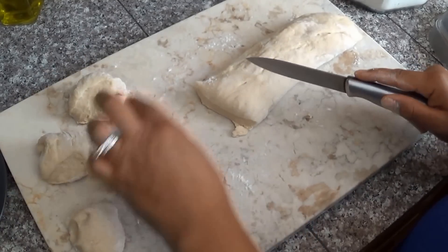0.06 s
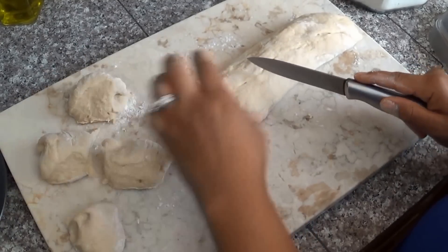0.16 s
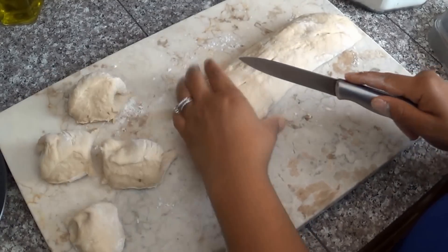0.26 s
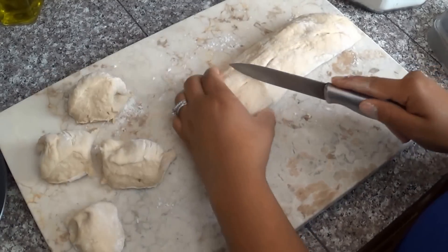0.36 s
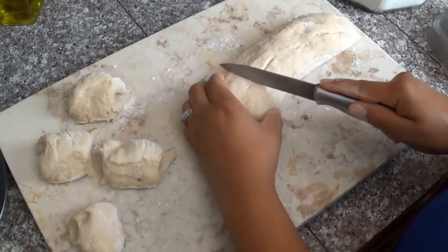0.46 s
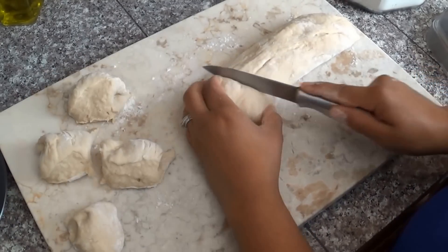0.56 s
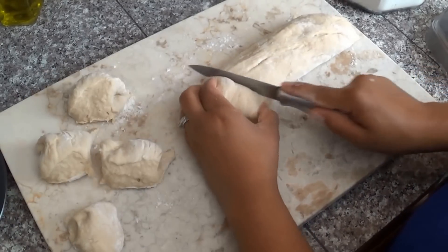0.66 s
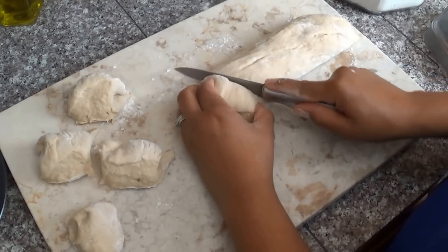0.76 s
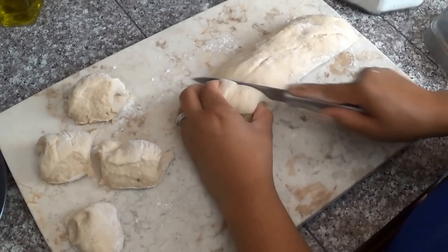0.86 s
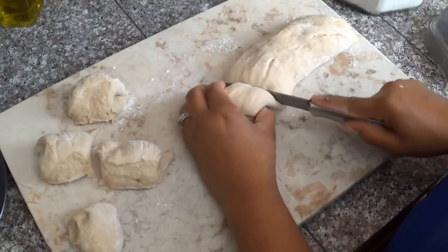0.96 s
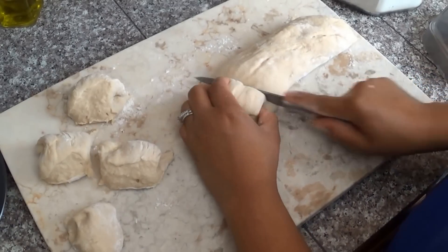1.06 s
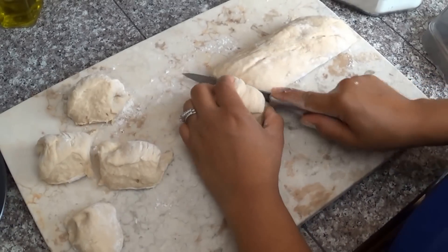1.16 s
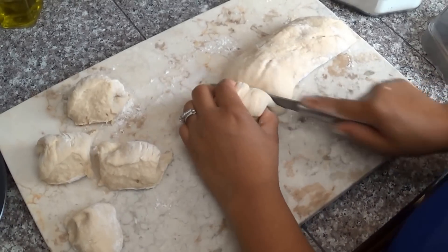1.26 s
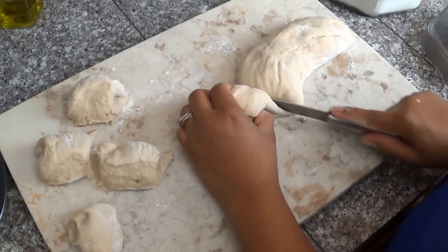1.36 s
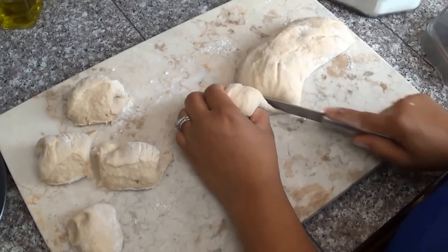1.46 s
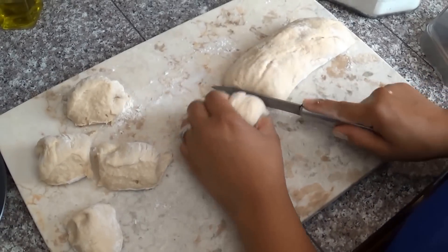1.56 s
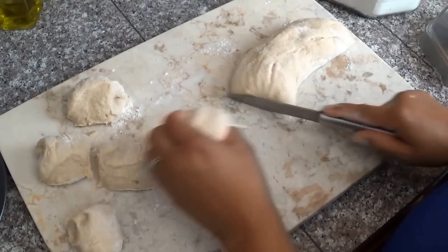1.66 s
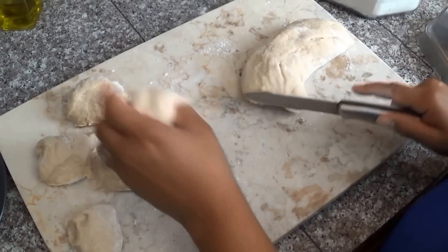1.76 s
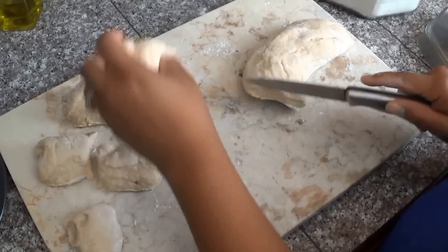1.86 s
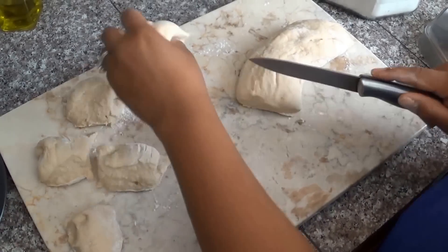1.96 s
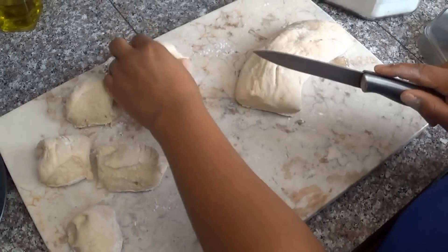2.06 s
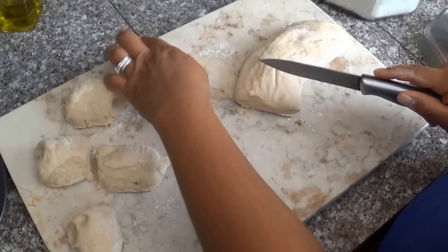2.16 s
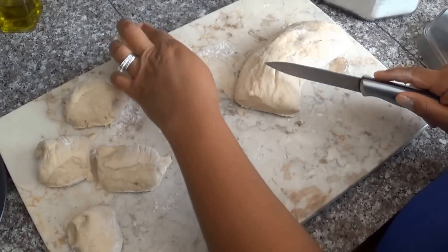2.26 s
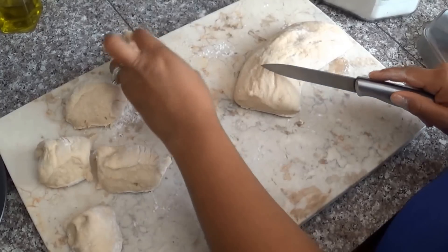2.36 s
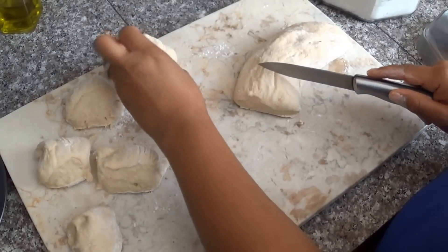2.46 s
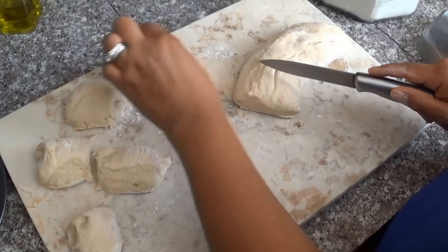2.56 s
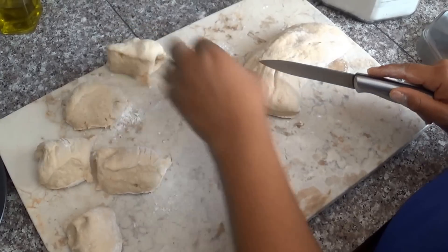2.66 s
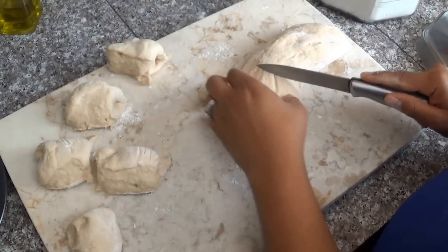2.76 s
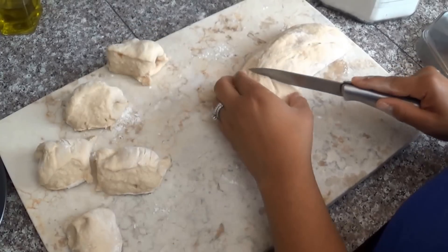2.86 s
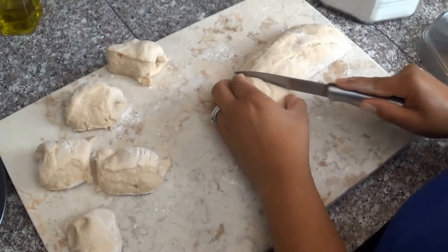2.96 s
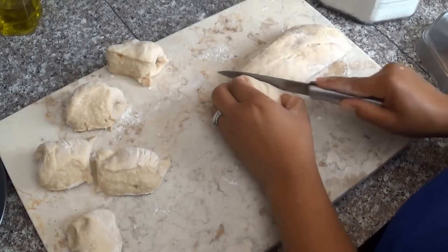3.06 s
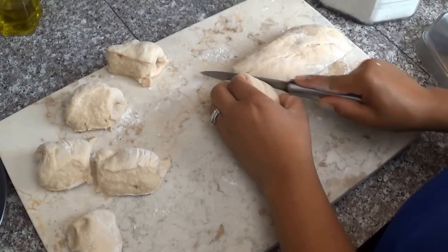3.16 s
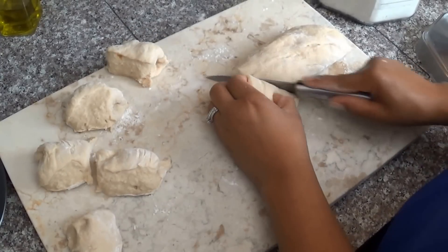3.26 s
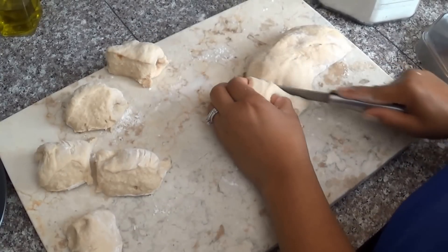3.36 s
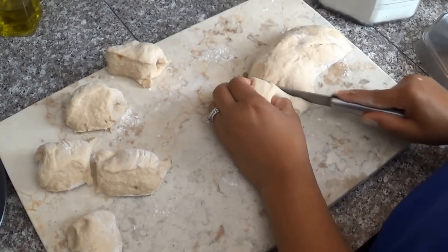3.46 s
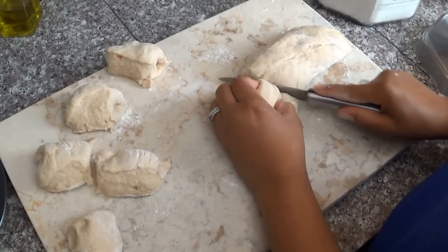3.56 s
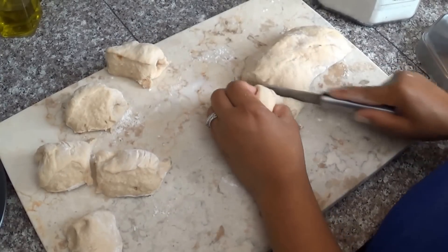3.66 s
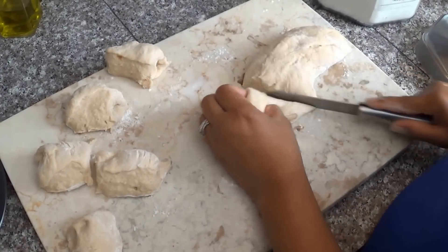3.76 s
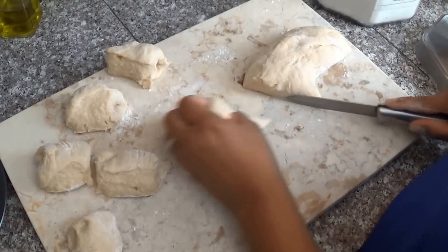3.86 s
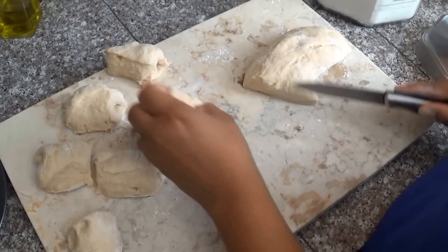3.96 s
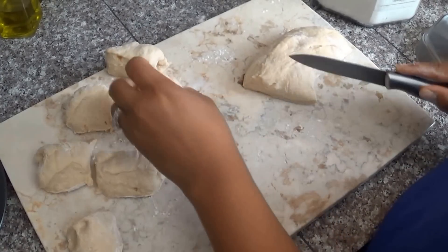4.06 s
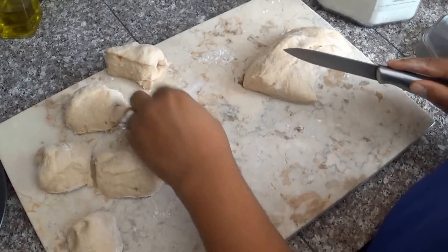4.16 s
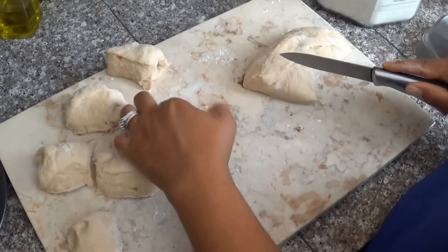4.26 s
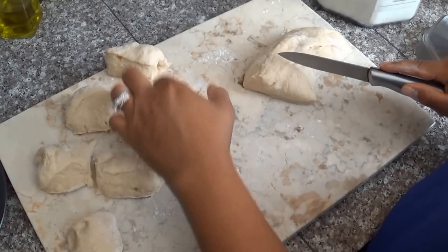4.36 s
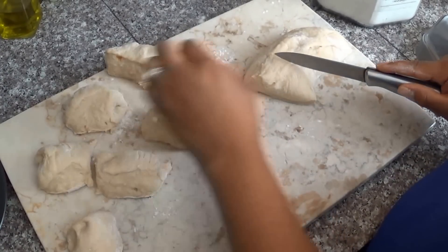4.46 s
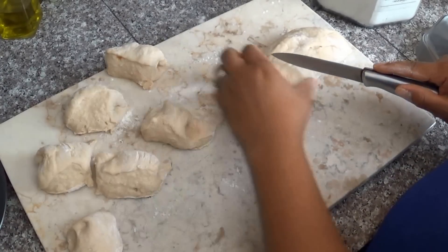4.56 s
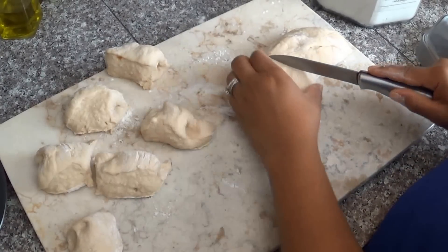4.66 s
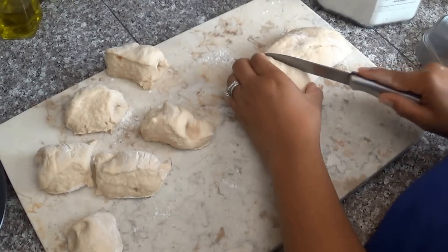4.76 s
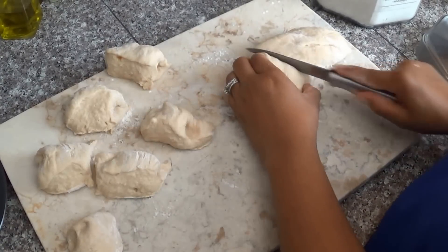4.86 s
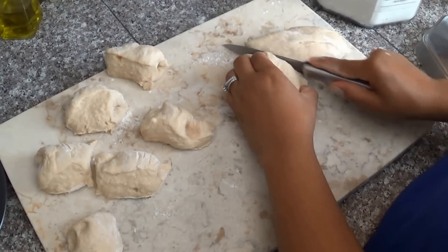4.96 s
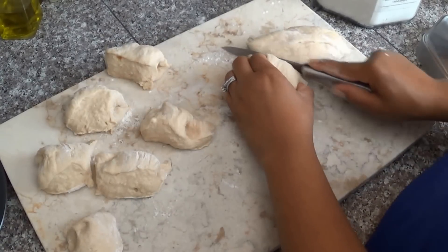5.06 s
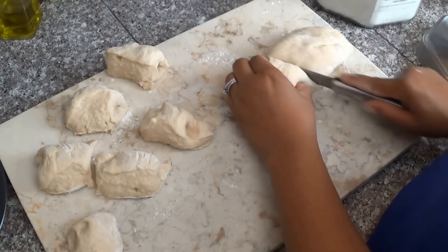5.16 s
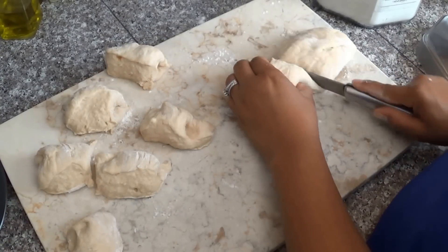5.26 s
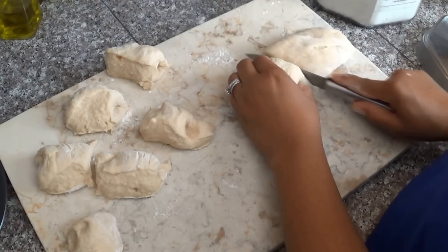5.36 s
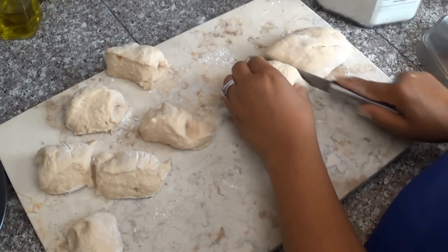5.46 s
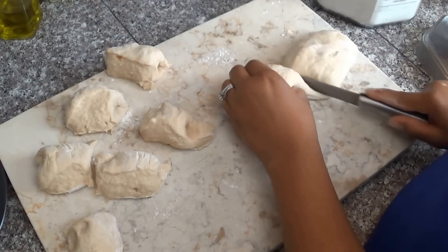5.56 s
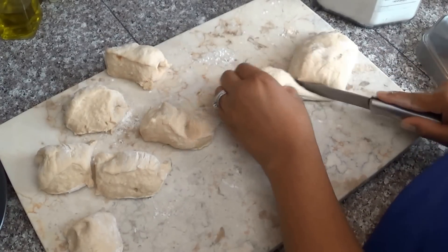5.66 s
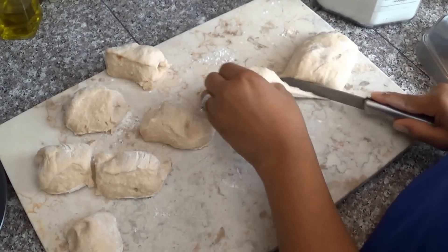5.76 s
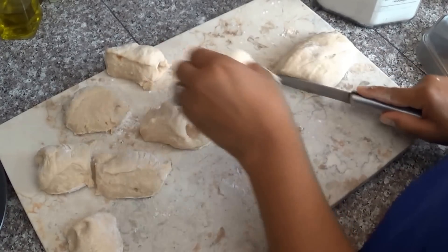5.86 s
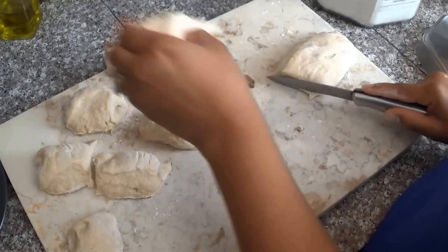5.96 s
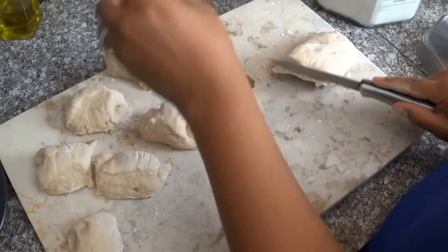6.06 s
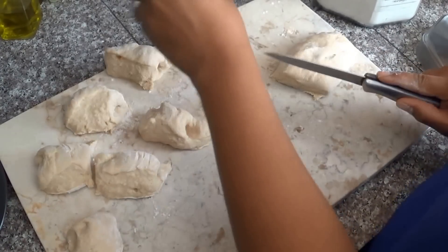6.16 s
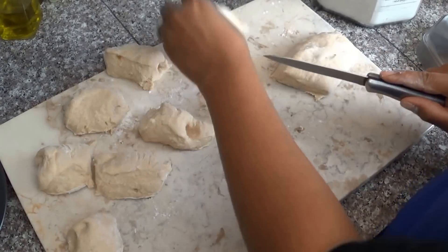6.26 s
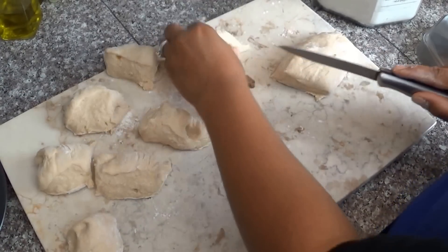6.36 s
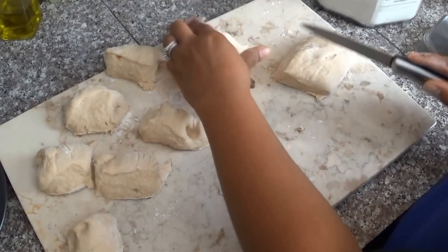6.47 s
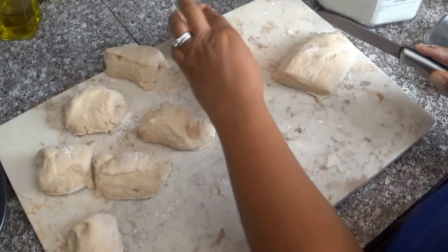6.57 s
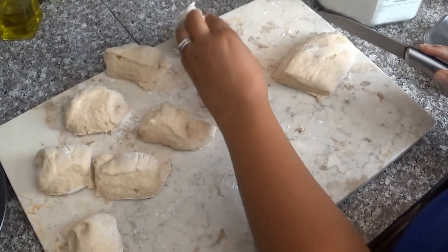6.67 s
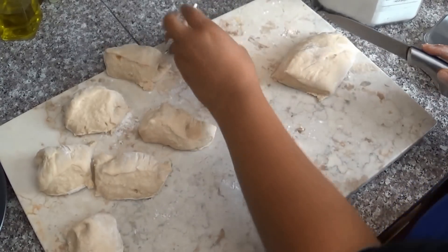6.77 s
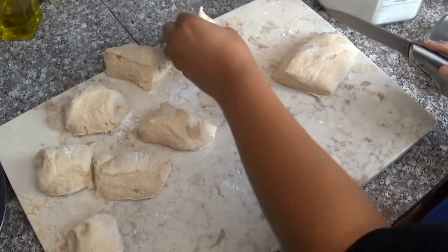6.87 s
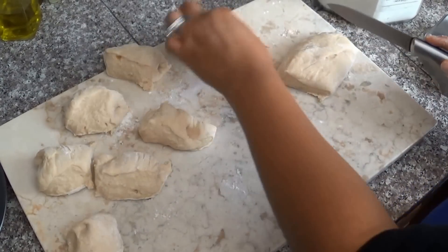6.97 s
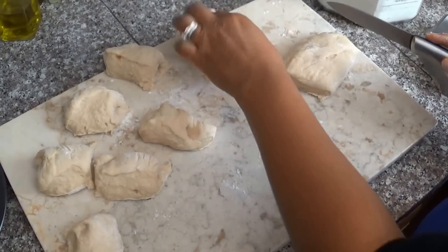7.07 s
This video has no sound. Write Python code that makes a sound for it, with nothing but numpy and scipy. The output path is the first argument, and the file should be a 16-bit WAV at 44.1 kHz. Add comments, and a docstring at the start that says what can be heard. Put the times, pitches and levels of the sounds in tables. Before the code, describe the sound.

Close to the microphone in a small kitchen, a steel knife cuts dough on a floury stone board. Dry flour hisses under hands, then the blade taps, grinds and rings against stone. A piece lands with a firm, dull pat. A second cut brings the loudest squeal, followed by light pats, and a third cut scrapes more quietly. Steady hiss and a thin high whine stay underneath.

```python
"""Cutting dough on a stone board

A kitchen knife cuts three pieces off a roll of dough, close to the microphone. Tiny random slips make
the blade hiss, grind, ring and catch; short blows make it knock on the stone. Coloured noise gives the
hands rubbing over flour and the pieces being set down. The room adds short reflections, a steady hiss,
a thin high whine and, late, a faint whistle."""
import sys
import numpy as np
from scipy import signal
from scipy.fft import rfft, irfft
from scipy.io import wavfile
from scipy.ndimage import uniform_filter1d

SR = 44100
rng = np.random.default_rng(int(sys.argv[2]) if len(sys.argv) > 2 else 0)


def master_out(mix):
    """Clip the mix to full scale and print it as 16-bit PCM to the path in sys.argv[1]."""
    frames = np.transpose(np.atleast_2d(mix))
    ceiling = np.clip(frames, -1, 1)
    pcm = np.round(ceiling * 32767).astype(np.int16)
    wavfile.write(sys.argv[1], SR, pcm)


N = 314433  # length in samples
TIME = np.arange(N) / SR  # seconds

# Movements. Some functions below trim these levels a little further.
# strokes of the edge over stone: (start [s], rise [s], fall [s], grinding [dB], then relative to grinding:
# first blade mode [dB], second blade mode [dB], board [dB], flour hiss [dB])
STROKES = [(1.205, 0.015, 0.05, -38.5, -26, -9, -10, -2.5), (1.268, 0.068, 0.064, -32.5, -6, -6.5, -12, -4),
           (1.53, 0.049, 0.084, -39.5, -7, -2, -14, 4), (1.585, 0.049, 0.047, -36.5, -6, -2, -4, -2.5),
           (1.684, 0.027, 0.034, -34.5, -11, 0, -29, -3.5), (1.708, 0.027, .062, -29.5, -2.5, 0, -9.5, -7),
           (3.553, 0.1, 0.053, -35.5, -1.5, -1, -10, -2.5), (3.71, 0.063, 0.054, -32.5, -0.5, 6, -11, -2),
           (3.775, 0.056, 0.061, -29, 8, 7, -10, -2.5), (3.85, 0.046, 0.099, -34, -12, 5.5, -18, -1.5),
           (3.938, 0.047, 0.055, -43.5, -1, 12, -3.5, -10), (5.41, .035, 0.11, -40.5, -17, -5, -4.5, -1),
           (5.536, 0.069, 0.097, -30, -11, 1, -6, -1.5), (5.63, 0.048, 0.065, -35.5, -2, 6, -5.5, -1),
           (5.70, 0.044, .04, -33, -14, 4.5, -24, -15), (5.825, 0.052, 0.06, -43.5, 3.5, 0, -5, -2.5),
           (5.86, .09, 0.056, -40.5, -9, 1, -6.5, -3), (6.0, .035, 0.027, -51, 3.5, 5, 5, -8)]
# the edge resting lightly on the stone, once for each cut: (start [s], rise [s], fall [s], grinding [dB])
CONTACTS = [(1.2, 0.39, 0.61, -56), (3.54, 0.27, 0.31, -45), (5.4, 0.43, .36, -51.5)]
# mix of that light contact: (grinding [dB], first mode [dB], second mode [dB], board [dB], flour hiss [dB])
CONTACT_MIX = [-2.5, -3.5, -2, 0.5, 1.5]
# steel or skin slides over floured dough: (start [s], rise [s], fall [s], level [dB])
RUBS = [(.33, .18, 0.075, -46.5), (.58, .06, .1, -51.5), (.72, 0.13, 0.25, -46), (1.1, 0.1, 0.066, -48),
        (1.35, 0.063, 0.16, -44), (1.73, 0.047, 0.087, -42.5), (2.16, .035, 0.043, -48.5),
        (2.25, 0.097, 0.065, -43), (2.56, .05, 0.064, -54), (3.12, 0.15, 0.081, -48),
        (3.34, .13, 0.063, -44.5), (4.26, 0.023, 0.022, -40.5), (4.31, 0.032, 0.028, -45),
        (4.88, 0.19, 0.066, -45.5), (5.14, 0.14, 0.076, -42.5), (6.04, 0.13, 0.16, -52.5),
        (6.38, .07, 0.13, -52), (6.54, 0.11, .1, -41.5), (6.97, 0.057, .04, -53)]
# dough pushed along the board:
# (start [s], rise [s], fall [s], drag [dB], ring of the resting blade relative to drag [dB])
SHOVES = [(.35, 0.083, 0.078, -50, 0.5), (.44, 0.076, 0.084, -50.5, -0.5), (1.82, 0.22, .2, -55.5, -18),
          (2.82, 0.047, 0.092, -47, 0), (3.33, .06, 0.12, -56, -21), (4.11, .045, .06, -54, -21),
          (5.24, .08, .07, -52, -7), (4.315, 0.029, 0.021, -45.5, -11), (5.365, .03, 0.018, -45, 4.5)]
# a faint wavering whistle in the room: (start [s], rise [s], fall [s], level [dB])
WHISTLES = [(6.78, 0.15, .4, -57.5)]

# Short events.
# short runs where the point of contact favours one blade mode:
# (time [s], length [s], level [dB], pitch [Hz], width [Hz])
RASPS = [(1.323, .045, -30.5, 3980, 130), (1.298, 0.076, -39, 8840, 400), (1.55, 0.094, -40, 5240, 160),
         (1.688, 0.052, -36, 7160, 450), (1.719, 0.037, -34, 2400, 220), (3.613, 0.056, -38, 3660, 60),
         (3.813, 0.074, -32.5, 4770, 130), (3.814, 0.032, -38, 9450, 300), (3.97, 0.059, -37.5, 2295, 60),
         (5.595, 0.15, -36, 2280, 50), (5.723, 0.058, -39, 3860, 70), (5.865, 0.092, -44.5, 5440, 260)]
# the edge catches and squeaks: (time [s], level [dB], pitch [Hz])
CATCHES = [(1.213, -25.5, 1908), (1.371, -29, 1907), (1.735, -22.5, 1960), (1.74, -20.5, 2804),
           (3.560, -44, 2000), (3.746, -22, 2844), (3.824, -6.5, 1936), (3.825, -12.5, 2808),
           (3.845, -21.5, 1883), (3.873, -15, 2860), (3.958, -23.5, 2790), (3.66, -32, 1902),
           (5.610, -27.5, 1845), (5.675, -20, 2820)]
# the blade knocks on the stone: (time [s], board [dB], blade ring [dB])
KNOCKS = [(1.105, -32.5, -39.5), (1.213, -25.5, -37), (1.4874, -33, -23.5), (3.559, -34.5, -34),
          (5.425, -29, -21), (5.593, -25, -35), (5.612, -37, -25), (6.4135, -37, -33.5)]
# dough and hand land on the board: (time [s], board [dB], counter thump [dB], contact snap [dB])
PATS = [(2.155, -13.5, -28.5, -13), (4.2753, -47, -43, -31), (4.300, -56, -45, -59), (4.334, -41, -58, -38),
        (4.412, -56, -63, -45), (5.855, -41, -39, -46), (6.442, -31, -40, -33.5), (6.484, -37, -61, -44)]

# Modes: the pitches at which a thing rings.
# the blade's first strong bending mode, a cluster: (pitch [Hz], width [Hz], level [dB])
FIRST_MODE = [(1850, 40, -11), (1914, 28, 0), (1945, 28, -6)]
# its second strong bending mode, a cluster: (pitch [Hz], width [Hz], level [dB])
SECOND_MODE = [(2724, 30, -8), (2810, 24, 0), (2926, 30, -6), (3038, 30, -8)]
# the blade's other modes: (pitch [Hz], width [Hz], level [dB])
OTHER_MODES = [(2291, 30, 2), (3680, 50, -1), (3942, 50, 2), (4110, 90, -8), (4570, 60, -7), (4718, 50, -3),
               (5220, 80, -6), (5440, 120, -6), (6060, 90, -13), (7020, 160, -10), (8130, 55, -12),
               (9020, 130, -13)]
# the stone board: (pitch [Hz], width [Hz], level [dB])
BOARD_MODES = [(291, 113, -11.5), (389, 35, -4), (512, 54, -8), (613, 37, 3.5), (693, 160, -7),
               (1033, 108, -4), (1175, 24, -12), (1303, 79, -7.5), (1590, 130, -16)]
# the counter under the board: (pitch [Hz], width [Hz], level [dB])
COUNTER_MODES = [(49.7, 37, -7.5), (103.5, 15, 5.5), (184, 64, -5.5), (229, 42, -11)]

# Colours: only the shape counts, as each sound is then set to rms 1.
# crackle of the grinding edge: (frequency [Hz], level per Hz [dB])
GRIT_COLOUR = [(100, -26), (400, -18), (1000, 0), (1600, -15), (2400, 1.5), (3300, 5.5), (5400, 2),
               (6500, -3), (7900, -17), (9500, -7), (12000, -39), (14000, -18), (16000, -41)]
# dragging along the board: (frequency [Hz], level per Hz [dB])
DRAG_COLOUR = [(60, -14), (200, -1), (400, -5), (620, -6.5), (1000, 2), (1600, 2.5), (3000, -4),
               (8000, -31)]
# flour grains: (frequency [Hz], level per Hz [dB])
FLOUR_COLOUR = [(200, -18), (1000, -11), (3000, -8.5), (5500, -8), (8000, -6), (10500, -0.5), (12000, -3),
                (13500, -11), (16000, -20)]
# dry snap of a contact: (frequency [Hz], level per Hz [dB])
SNAP_COLOUR = [(100, -31), (600, 13.5), (1000, 0), (1500, 8.5), (2400, -7), (3500, -14), (5000, -12),
               (9000, -12), (13000, -16), (16000, -31)]
# thud of a landing lump: (frequency [Hz], level per Hz [dB])
THUD_COLOUR = [(40, -18), (100, -2), (220, 0.5), (450, 5), (750, -5), (1500, -16), (2500, -22), (6000, -43)]
# room noise and microphone hiss: (frequency [Hz], level per Hz [dB])
HISS_COLOUR = [(15, -21), (25, -5), (151, -2), (183, -3), (220, -1), (313, -3), (348, -1.5), (565, -2.5),
               (759, -4), (1230, -5), (2480, -7), (2680, -7.5), (8530, -13.5), (14200, -15), (15400, -15.5)]

# Space.
# likeness of the hiss in the two channels: (frequency [Hz], likeness [0 to 1])
HISS_LIKENESS = [(40, .99), (150, 0.92), (400, 0.43), (1500, 0.092), (5000, 0.56), (12000, 1)]
# likeness of the reflections, where less than 0 is taken as 0: (frequency [Hz], likeness [up to 1])
ECHO_LIKENESS = [(60, 1), (300, 0.96), (1000, 0.43), (2500, 0.033), (5000, -0.68), (12000, 1)]
# how long the kitchen's tail takes to fall by 60 dB: (frequency [Hz], time [s])
KITCHEN_DECAY = [(100, 0.42), (500, 0.34), (2000, 0.16), (6000, 0.27), (14000, 0.14)]

# Depth: how far below its peak a movement starts and ends [dB]. Curve: 1 is pointed, 2 is round.
STROKE_DEPTH_DB, STROKE_CURVE = 24, 2.03
RUB_DEPTH_DB, RUB_CURVE = 18.5, 2.1
SHOVE_DEPTH_DB, SHOVE_CURVE = 28.5, 2.4
WHISTLE_DEPTH_DB, WHISTLE_CURVE = 11, 3.4
KNOCK_THUMP_DB, KNOCK_SNAP_DB = -26, -8  # counter thump and contact snap, relative to the board
PAT_BLADE_DB = -8  # the blade's ring, relative to the board
KNOCK_HARD_HZ, PAT_HARD_HZ = 3860, 940  # hardness of a blow, as a cut-off
PAT_DAMPING = 1.33  # dough lying on the board widens its modes by this factor
CATCH_SWELL_S = 0.0041
HISS_DB = -48.5
EDGE_HZ = 16000  # top of the recorder's band


def gain_of(db):
    """Turns decibels into amplitude."""
    return 10 ** (np.asarray(db) / 20)


def evened(x):
    """Scales a sound to rms 1."""
    return x / np.sqrt(np.mean(x ** 2) + 1e-20)


def read(points, hz):
    """Reads a table between its points, on a log-frequency axis."""
    f, value = np.transpose(points)
    return np.interp(np.log(hz + 1), np.log(f + 1), value)


def add(mix, s, sound):
    """Adds a sound into the mix at time s, cutting off what runs past the end."""
    part = mix[round(s * SR):][:len(sound)]
    part += sound[:len(part)]


def coloured(x, spectrum):
    """Weights the frequencies of x by a smooth colour, at rms 1."""
    weight = gain_of(read(spectrum, np.fft.rfftfreq(len(x), 1 / SR)))
    return evened(irfft(rfft(x) * weight, len(x)))


def wander(rate_hz):
    """Makes a slow random drift of rms 1, from noise with little left above rate_hz."""
    weight = 1 / (1 + (np.fft.rfftfreq(N, 1 / SR) / rate_hz) ** 4)
    return evened(irfft(rfft(rng.standard_normal(N)) * weight, N))


def ringing(modes, rise_s=1e-5, size=11000):
    """Rings a set of modes after one blow: dying sines, wider ones die faster; peak 1."""
    t = np.arange(size) / SR
    ring = np.zeros(size)
    for k, (hz, width, db) in enumerate(modes):
        sign = (-1) ** k  # neighbours move in opposite phase
        ring += sign * gain_of(db) * width * np.exp(-np.pi * width * t) * np.sin(2 * np.pi * hz * t)
    ring = ring * (1 - np.exp(-t / rise_s))
    return ring / abs(ring).max()


def through(x, modes, rise_s=0.00091):
    """Drives a set of modes with x; each push takes a moment to build up. Rms 1."""
    return evened(signal.oaconvolve(x, ringing(modes, rise_s))[:N])


def level(rows, depth_db, curve, column=0):
    """Gives the gain over time of movements that swell and fade; later level columns count from the first."""
    power = np.zeros(N)
    for start, rise, fall, *db in rows:
        near = slice(max(round((start - rise) * SR), 0), round((start + rise + 2 * fall) * SR))
        t = TIME[near] - start - rise  # 0 at the peak
        away = np.maximum(-t / rise, t / fall)
        peak_db = db[0] + (db[column] if column else 0)
        power[near] += gain_of(peak_db - depth_db * away ** curve) ** 2
    return np.sqrt(power)


def friction(per_s, spread_db, smooth, uneven_db):
    """Makes tiny slips of scattered size over a smooth rub, under a pressure that trembles."""
    happens = rng.random(N) < per_s / SR
    size = gain_of(spread_db * np.minimum(rng.exponential(1, N), 4))
    slips = happens * rng.choice([-1, 1], N) * size
    rub = evened(evened(slips) + smooth * rng.standard_normal(N))
    return rub * gain_of(uneven_db * wander(143))


def sustained(x, size=900):
    """Friction keeps feeding a mode, so its swing stays near the level that the movement sets."""
    return x / np.sqrt(np.abs(uniform_filter1d(x ** 2, size)) + 0.097)


def placed(x, left_db):
    """Spreads one sound over two channels, the left one louder by left_db."""
    return x * gain_of([[left_db / 2], [-left_db / 2]])


def paired(x, likeness):
    """Makes two unrelated signals as alike, at each frequency, as the likeness table says."""
    left, other = rfft(x)
    same = np.clip(read(likeness, np.fft.rfftfreq(x.shape[1], 1 / SR)), 0, 1)
    right = same * left + np.sqrt(1 - same ** 2) * other
    return irfft(np.array([left, right]), x.shape[1])


def scraping(upper_db=-0.5, grit_db=-4, first_db=1, second_db=-0.1, board_db=-1):
    """The edge grinds over floury stone: the same slips crackle and ring the blade and the board."""
    slips = friction(per_s=1100, spread_db=3.5, smooth=0.7, uneven_db=2.0)
    crackle = coloured(slips * rng.choice([-1, 1], N), GRIT_COLOUR)
    grains = friction(per_s=4000, spread_db=5.5, smooth=1.6, uneven_db=0.4)
    grind = edge(0) * (gain_of(upper_db) * shifting(slips) + gain_of(grit_db) * crackle)
    first = gain_of(first_db) * edge(1) * sustained(through(slips, FIRST_MODE))
    second = gain_of(second_db) * edge(2) * sustained(through(slips, SECOND_MODE))
    board = gain_of(board_db) * edge(3) * through(coloured(slips, DRAG_COLOUR), BOARD_MODES)
    flour = edge(4) * coloured(grains, FLOUR_COLOUR)
    return placed(grind + board + flour, 0.11) + placed(first, 1.4) + placed(second, -2.5)


def edge(column):
    """How hard the edge drives one part of the sound: the strokes, joined with light contact."""
    resting = gain_of(CONTACT_MIX[column]) * level(CONTACTS, RUB_DEPTH_DB, RUB_CURVE)
    return np.hypot(level(STROKES, STROKE_DEPTH_DB, STROKE_CURVE, column), resting)


def shifting(slips, shift_db=3.5, count=3):
    """As the point of contact travels along the edge, it favours now these blade modes, now those."""
    total = np.zeros(N)
    for k in range(count):
        modes = OTHER_MODES[k::count]
        loudest_db = max(db for _, _, db in modes)
        total += gain_of(loudest_db + shift_db * wander(8.6)) * through(slips, modes)
    return evened(total)


def rasps():
    """Short runs of slips each drive a single blade mode."""
    out = np.zeros(N)
    slips = friction(per_s=1800, spread_db=-2.0, smooth=1.0, uneven_db=2.5)
    for s, length, db, hz, width in RASPS:
        run = slips[round(s * SR):round((s + length) * SR)]
        ring = signal.fftconvolve(run, ringing([(hz, width, 0)], rise_s=0.000078))[:len(run)]
        add(out, s, gain_of(db) * evened(ring) * signal.windows.tukey(len(run), .5))
    return out


def catches(waver=0.0058, rough_db=2.8):
    """Stick and slip lock briefly onto one blade mode, which swells, wavers and dies."""
    out, drift, grain = np.zeros((2, N)), wander(91), gain_of(rough_db * wander(180))
    t = np.arange(4000) / SR
    swell = t / CATCH_SWELL_S * np.exp(1 - t / CATCH_SWELL_S)
    sides = [(1900, 1.5), (2800, -3.0), (4000, -5)]  # (pitch [Hz], left over right [dB])
    for s, db, hz in CATCHES:
        here = slice(round(s * SR), round(s * SR) + len(t))
        turns = np.cumsum(hz * (1 + waver * drift[here])) / SR
        squeak = gain_of(db) * swell * np.sin(2 * np.pi * turns) * grain[here]
        out[:, here] += placed(squeak, read(sides, hz))
    return out


def knocks(snap_s=0.0054, rattle=0.016, rattle_s=0.0085, slap_db=-7, slap_hz=1250, slap_width_hz=700):
    """Each blow, a push with a brief rattle, rings board, blade and counter, slaps and snaps."""
    out, t = np.zeros(N), np.arange(2048) / SR
    slap = gain_of(slap_db) * ringing([(slap_hz, slap_width_hz, 0)])
    blade, counter = ringing(FIRST_MODE + SECOND_MODE + OTHER_MODES), ringing(COUNTER_MODES)
    hard = [(s, db, ring_db, db + KNOCK_THUMP_DB, db + KNOCK_SNAP_DB, KNOCK_HARD_HZ, 1)
            for s, db, ring_db in KNOCKS]
    soft = [(s, db, db + PAT_BLADE_DB, thump_db, snap_db, PAT_HARD_HZ, PAT_DAMPING)
            for s, db, thump_db, snap_db in PATS]
    for s, board_db, blade_db, thump_db, snap_db, hard_hz, damping in hard + soft:
        board = ringing([(hz, width * damping, db) for hz, width, db in BOARD_MODES]) + slap
        chatter, crack = rng.standard_normal((2, len(t)))
        blow = (t == 0) + rattle * chatter * np.exp(-t / rattle_s)
        blow = signal.lfilter(*signal.butter(1, hard_hz, fs=SR), blow)  # a soft blow is duller
        add(out, s, signal.fftconvolve(blow, gain_of(board_db) * board + gain_of(blade_db) * blade))
        add(out, s, gain_of(thump_db) * counter)
        add(out, s, gain_of(snap_db) * coloured(crack, SNAP_COLOUR) * np.exp(-t / snap_s) / 2)
    return out


def dough(shove_db=-2, blade_db=-2, rustle_db=1):
    """Flour hisses under blade and fingers; a shoved lump drags and stirs the blade resting on it."""
    grains = friction(per_s=6500, spread_db=-1.5, smooth=1.5, uneven_db=1.26)
    rub = level(RUBS, RUB_DEPTH_DB, RUB_CURVE) * coloured(grains, FLOUR_COLOUR)
    drag = coloured(friction(per_s=820, spread_db=2.5, smooth=0.78, uneven_db=6.0), DRAG_COLOUR)
    dragging = evened(through(drag, BOARD_MODES) + gain_of(rustle_db) * drag)
    shove = level(SHOVES, SHOVE_DEPTH_DB, SHOVE_CURVE) * dragging
    blade = level(SHOVES, SHOVE_DEPTH_DB, SHOVE_CURVE, column=1) * sustained(through(drag, FIRST_MODE))
    return rub + gain_of(shove_db) * shove + gain_of(blade_db) * blade


def thuds(thud_db=-13, thud_s=0.012):
    """A landing lump squashes flat: a dull, pitchless burst of noise, set relative to the board."""
    out, t = np.zeros(N), np.arange(8192) / SR
    for s, db, _, _ in PATS:
        noise = coloured(rng.standard_normal(len(t)), THUD_COLOUR)
        add(out, s, gain_of(db + thud_db) * noise * np.exp(-t / thud_s))
    return out


def kitchen(x, early_db=-12, tail_db=-14, early_s=0.0047):
    """Adds quick reflections off counter and tiles, then a short tail, differing between the channels."""
    t = np.arange(SR // 2) / SR
    clicks = rng.random((2, 2, len(t))) < 2500 / SR  # 2500 reflections a second
    early, late = rng.choice([-1., 1.], (2, 2, len(t))) * clicks
    early = early * (t > .001) * np.exp(-t / early_s)
    # each frequency of the tail dies at its own pace
    hz, at, z = signal.stft(late * (t > .008), SR, nperseg=256)
    fade = gain_of(-60 * at / read(KITCHEN_DECAY, hz)[:, None])
    late = signal.istft(z * fade, SR, nperseg=256)[1][:, :len(t)]
    echo = np.zeros((2, len(t)))
    for db, part in [(early_db, early), (tail_db, late)]:
        echo += gain_of(db) * part / np.linalg.norm(part, axis=1, keepdims=True)
    return x + signal.fftconvolve(x, paired(echo, ECHO_LIKENESS), axes=1)[:, :N]


def background(whine_hz=15734, whine_db=-57.0, throb_hz=13.04, throb=0.14, side_phase=.2, whistle_db=-2):
    """Steady noise for room and microphone, a throbbing sine whine, and noise through one mode to whistle."""
    pair = paired(rng.standard_normal((2, N)), HISS_LIKENESS)
    hiss = gain_of(HISS_DB) * np.array([coloured(side, HISS_COLOUR) for side in pair])
    # the right channel runs ahead by side_phase [radians]
    phase = 2 * np.pi * whine_hz * TIME + side_phase * np.arange(2)[:, None]
    throbbing = 1 + throb * np.sin(2 * np.pi * throb_hz * TIME)
    whine = gain_of(whine_db) * throbbing * np.sin(phase)
    tone = through(rng.standard_normal(N), [(2080, 110, 0)])
    whistle = gain_of(whistle_db) * level(WHISTLES, WHISTLE_DEPTH_DB, WHISTLE_CURVE) * tone
    return hiss + whine + whistle


def scene():
    """Knife, dough and board sound in the kitchen, over its background."""
    close = scraping() + rasps() + catches() + knocks() + dough() + thuds()
    return kitchen(close) + background()


def record(dry):
    """The recorder's band limit: a steep low-pass filter."""
    low_pass = signal.firwin(801, EDGE_HZ, window=("kaiser", 8), fs=SR)
    return signal.oaconvolve(dry, low_pass[None], "same")


dry = scene()
out = record(dry)
master_out(out)
```